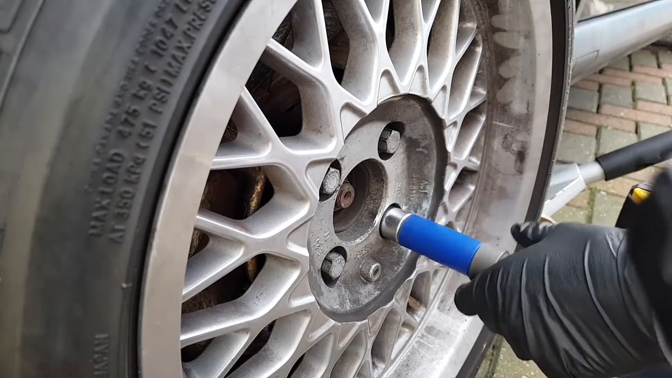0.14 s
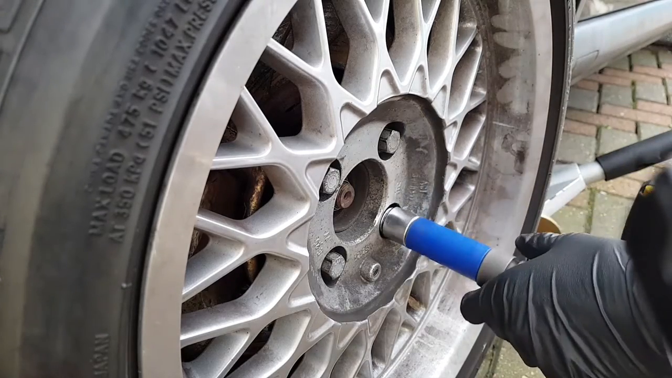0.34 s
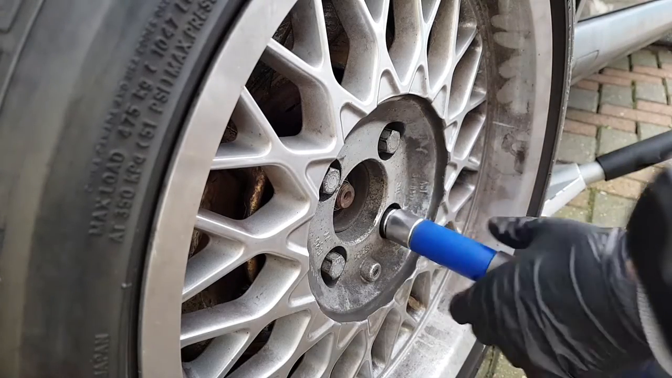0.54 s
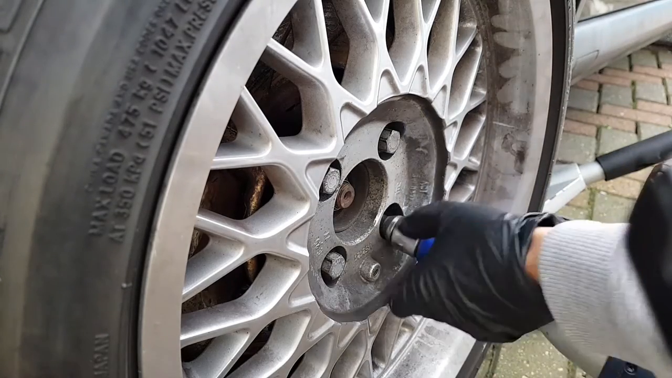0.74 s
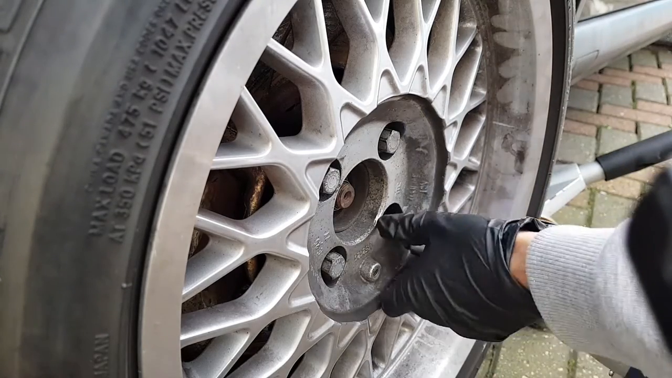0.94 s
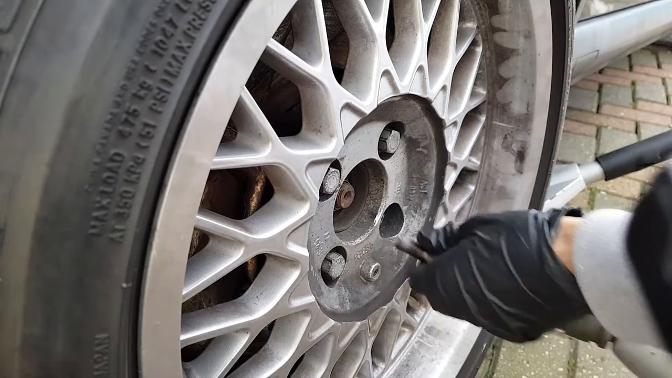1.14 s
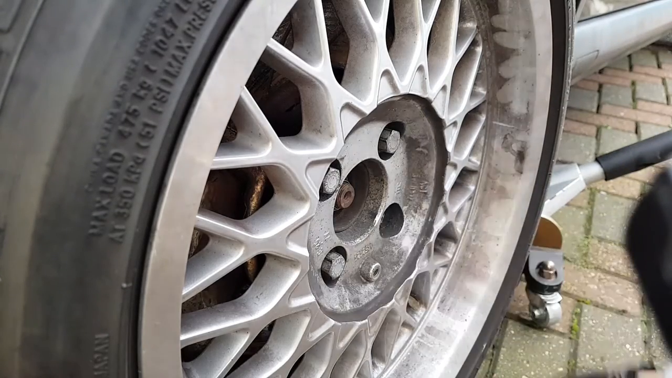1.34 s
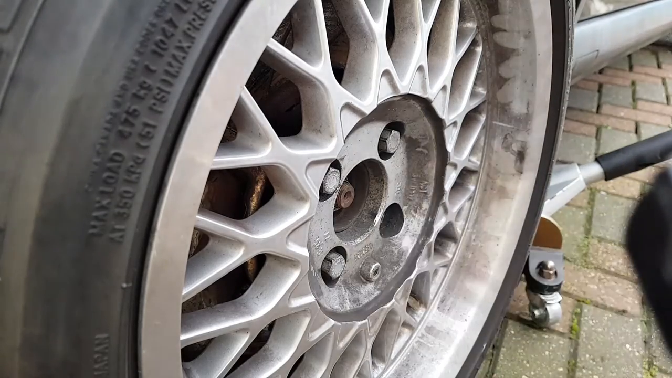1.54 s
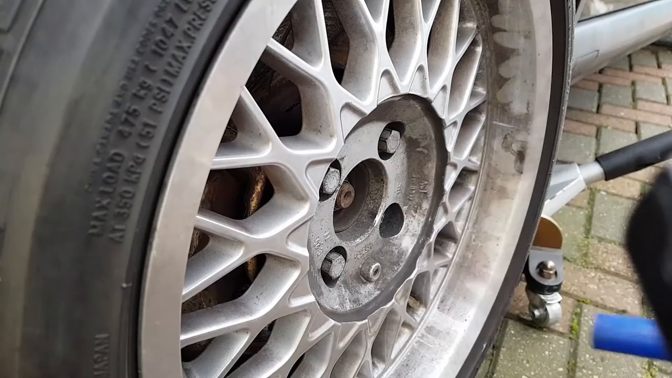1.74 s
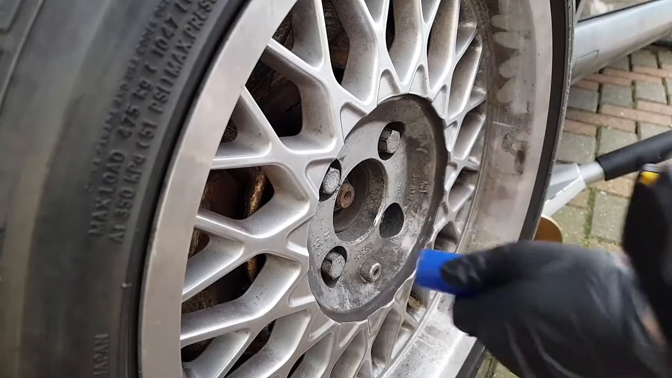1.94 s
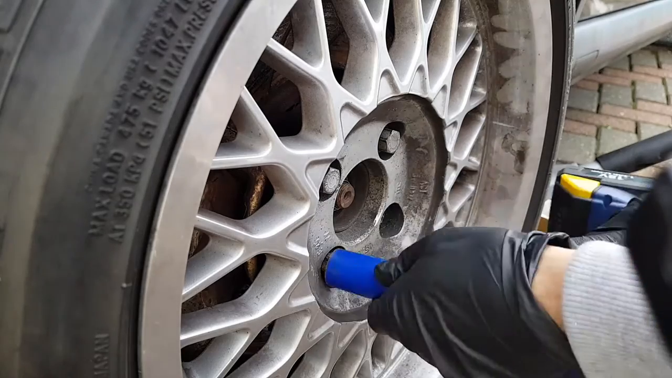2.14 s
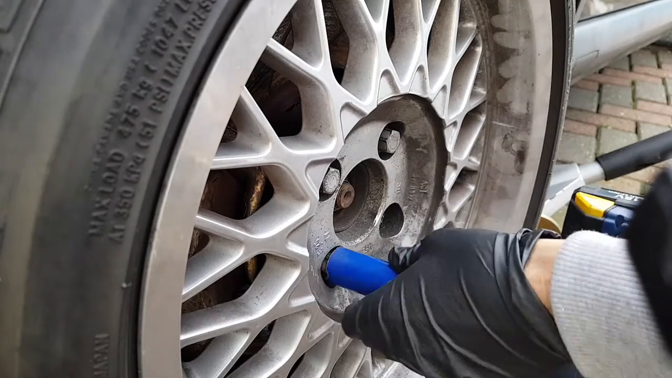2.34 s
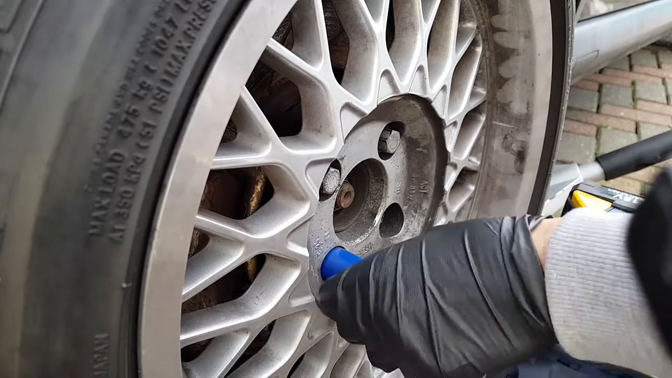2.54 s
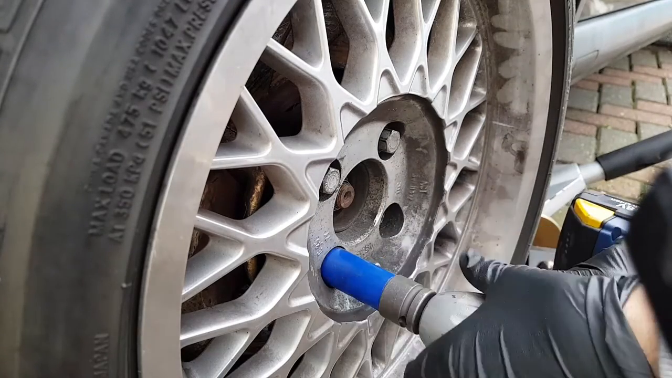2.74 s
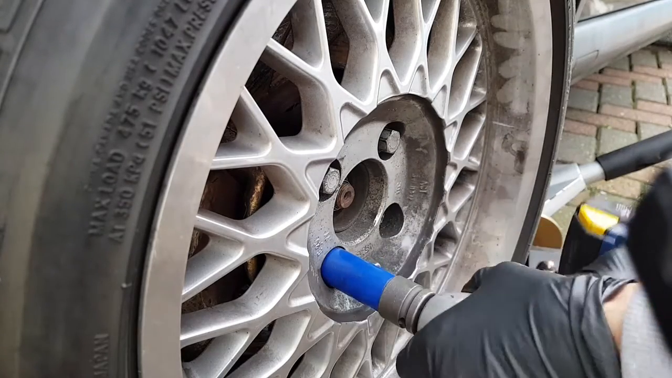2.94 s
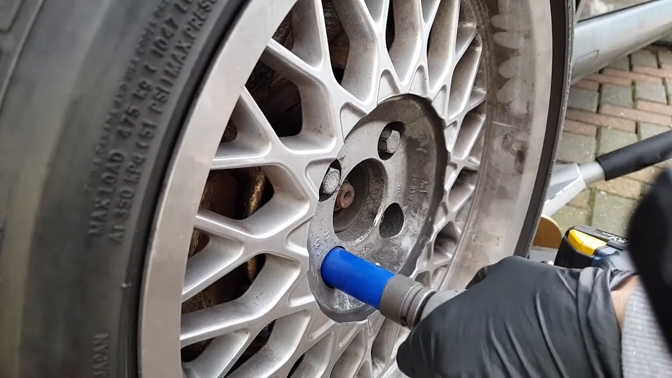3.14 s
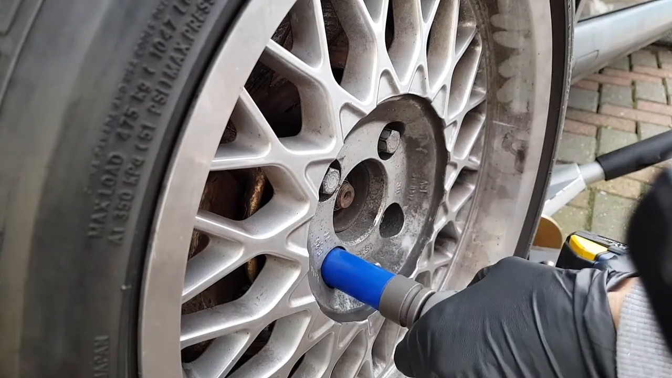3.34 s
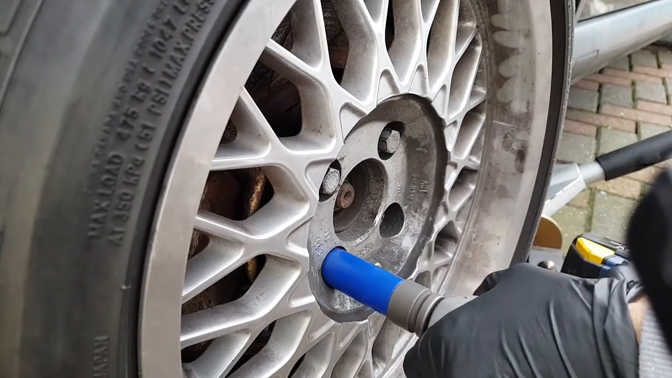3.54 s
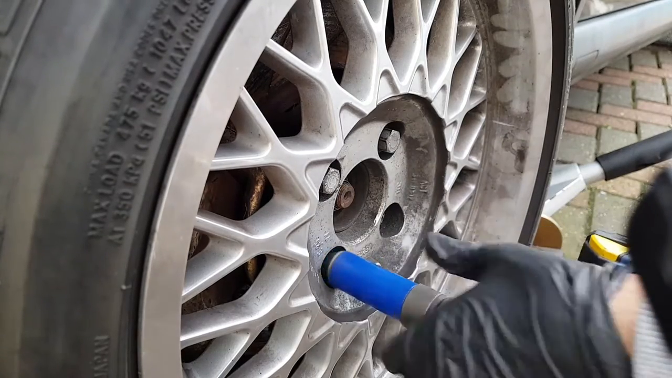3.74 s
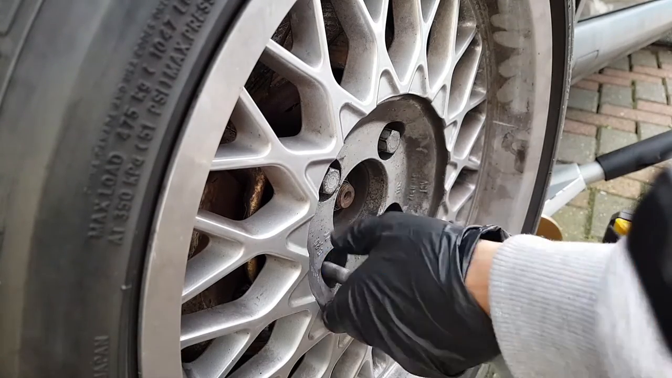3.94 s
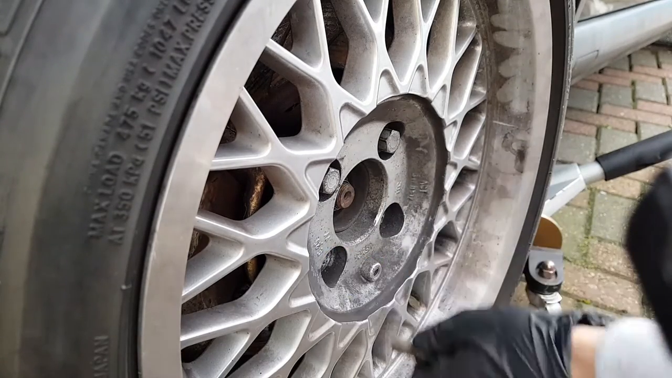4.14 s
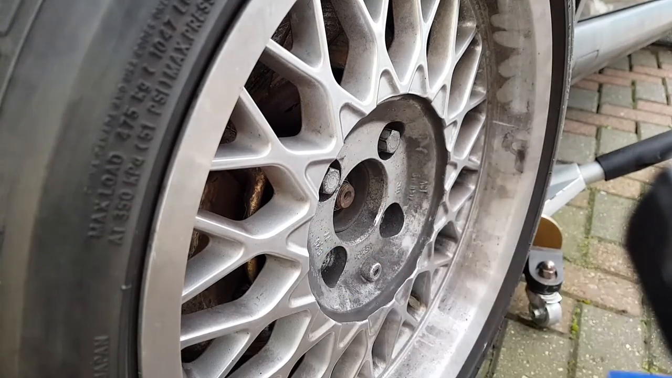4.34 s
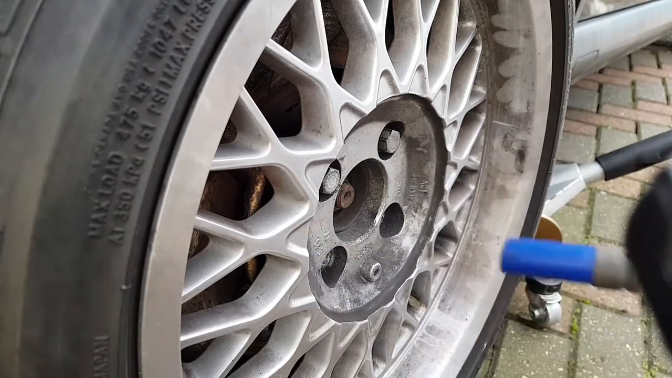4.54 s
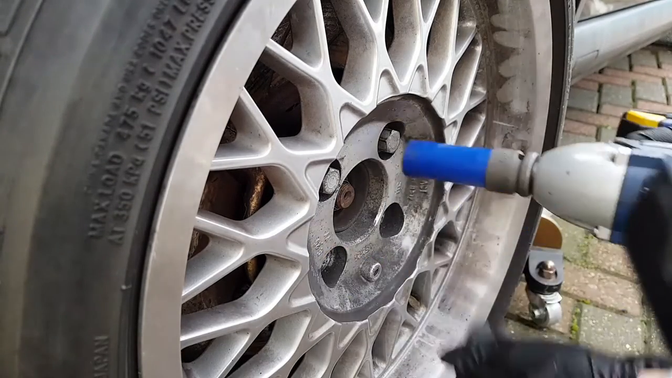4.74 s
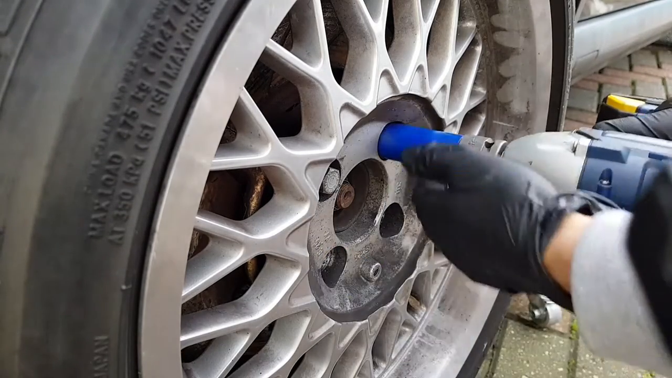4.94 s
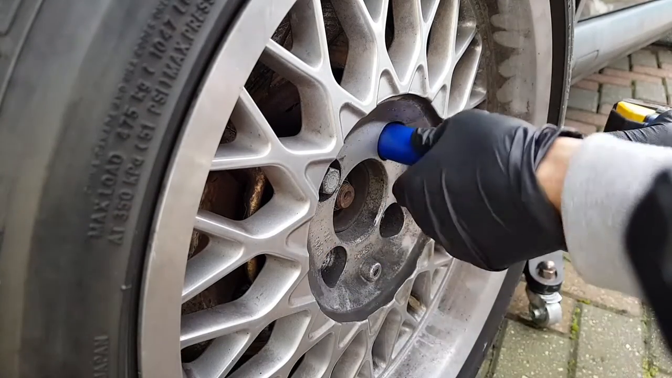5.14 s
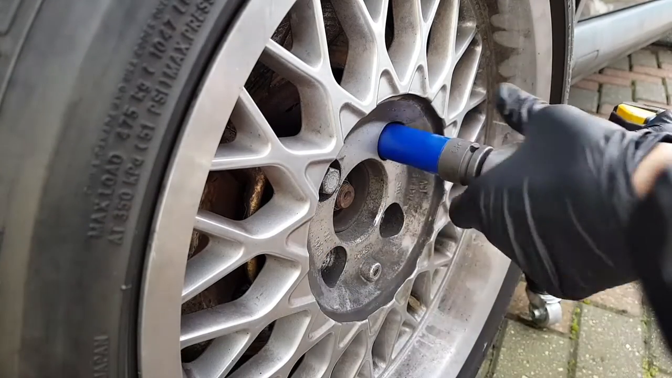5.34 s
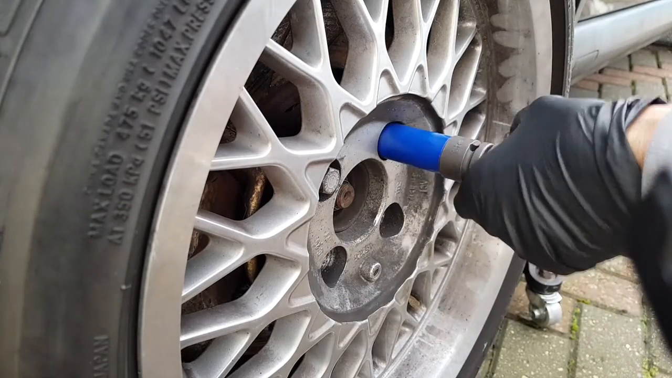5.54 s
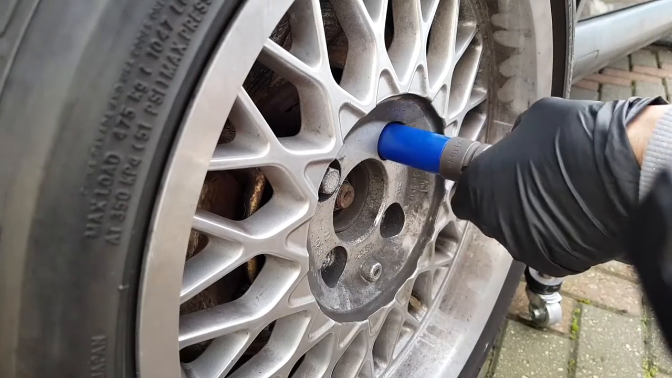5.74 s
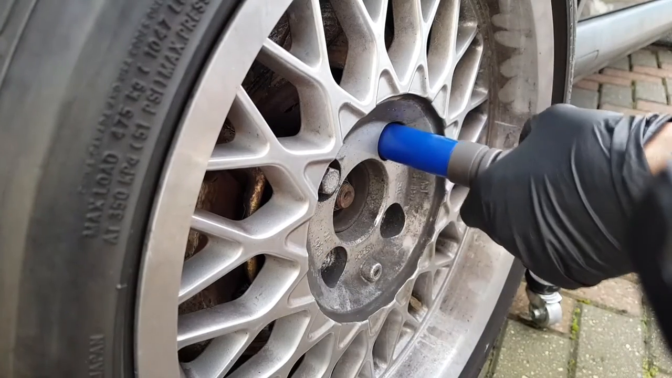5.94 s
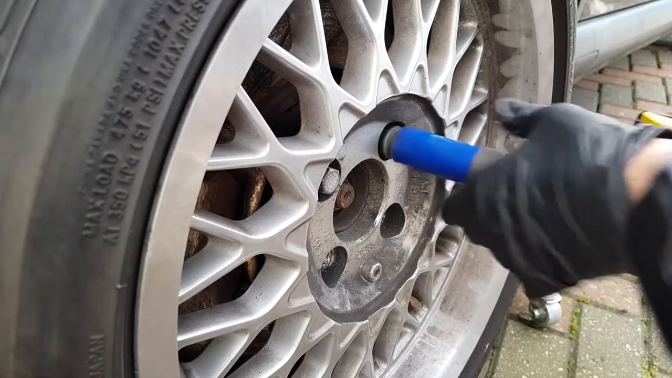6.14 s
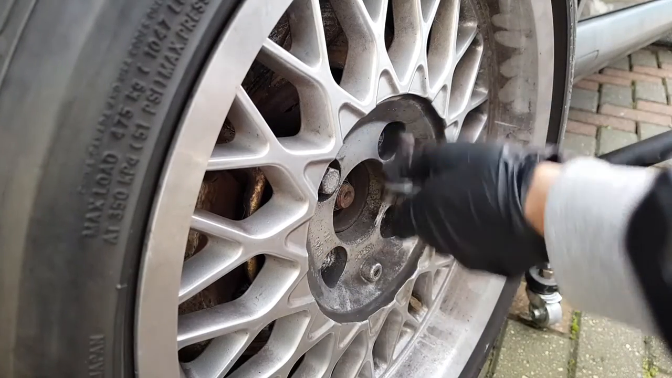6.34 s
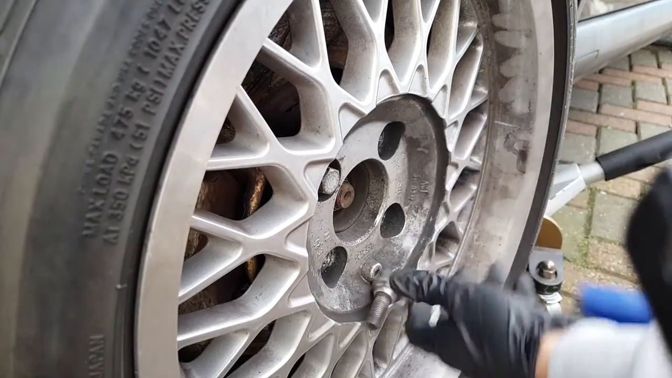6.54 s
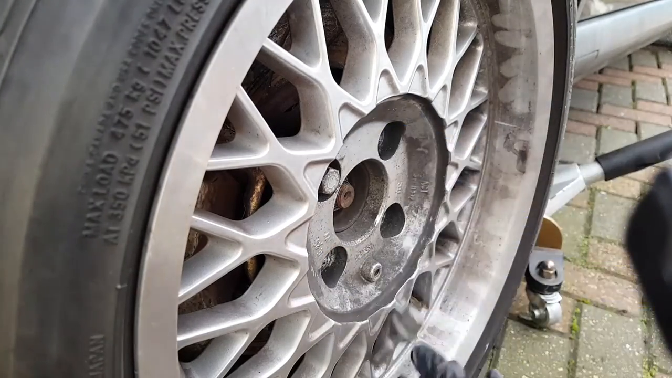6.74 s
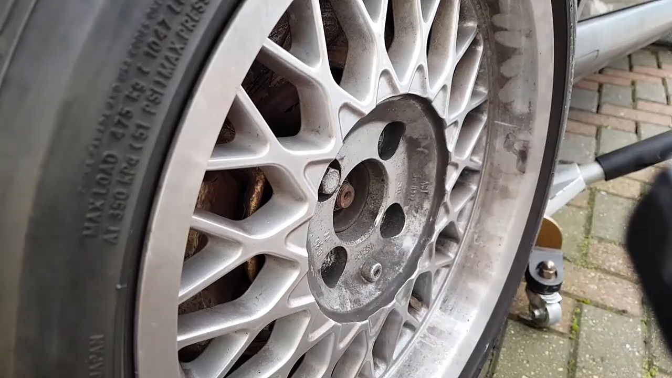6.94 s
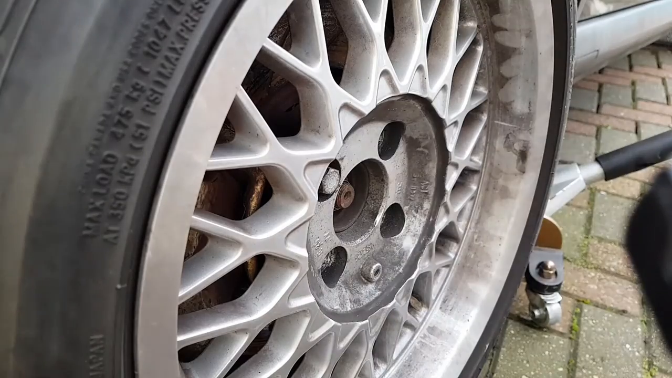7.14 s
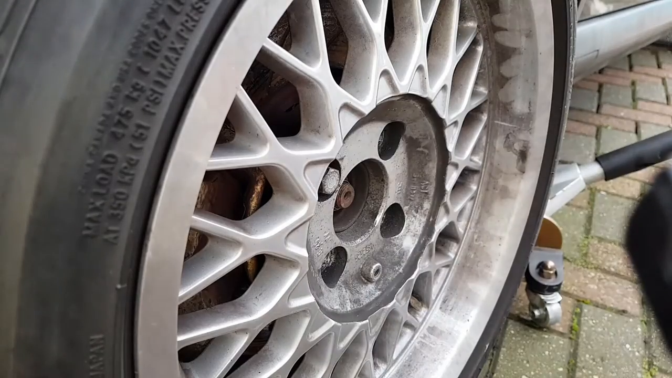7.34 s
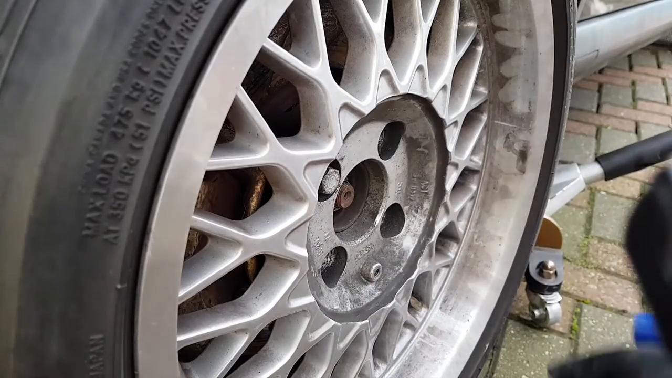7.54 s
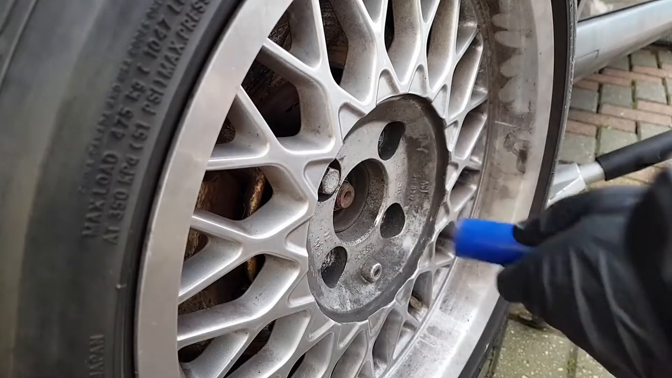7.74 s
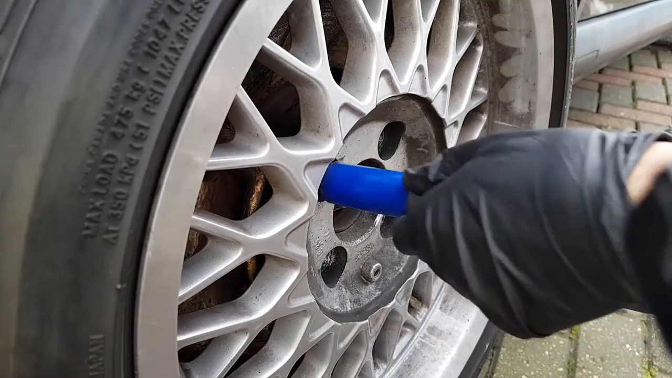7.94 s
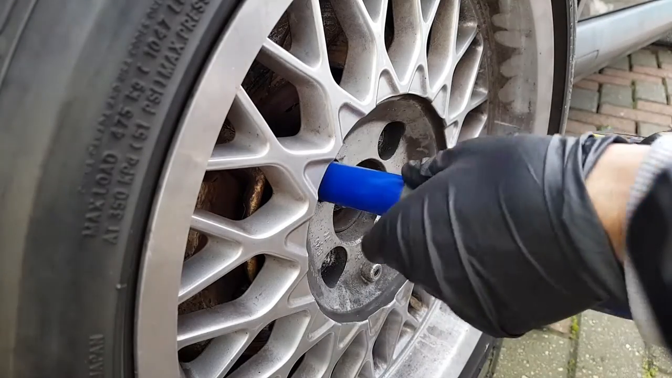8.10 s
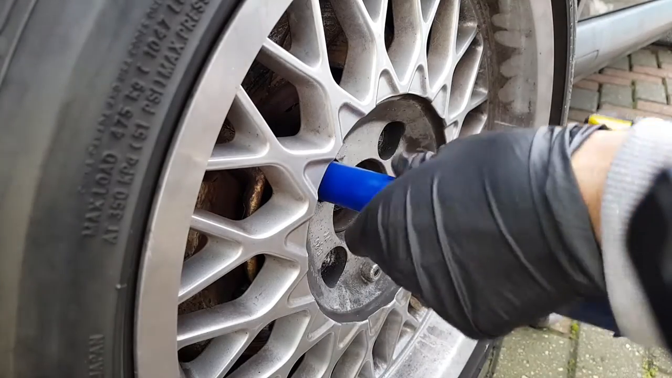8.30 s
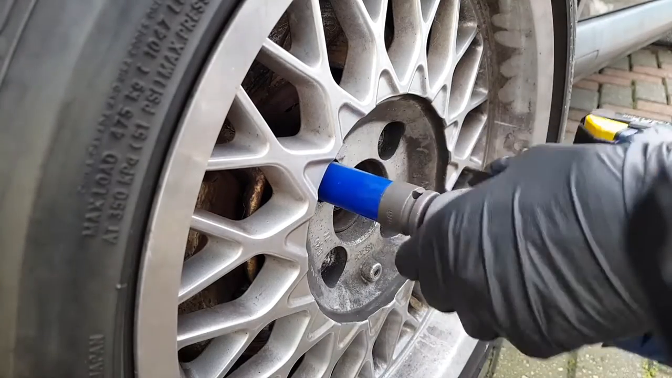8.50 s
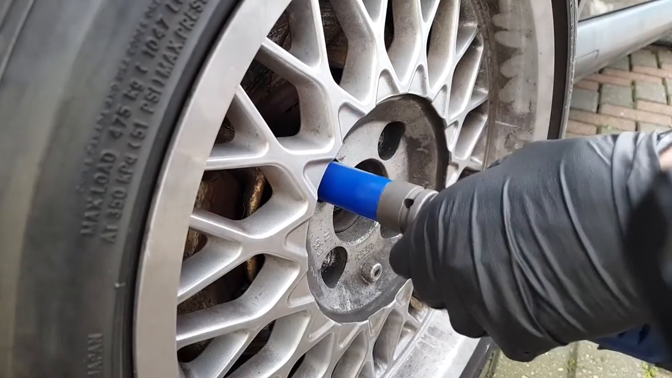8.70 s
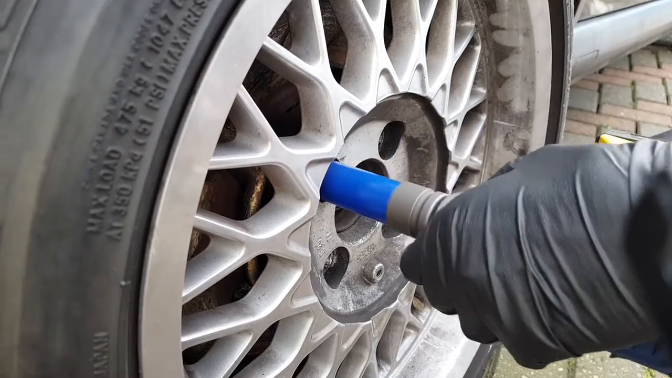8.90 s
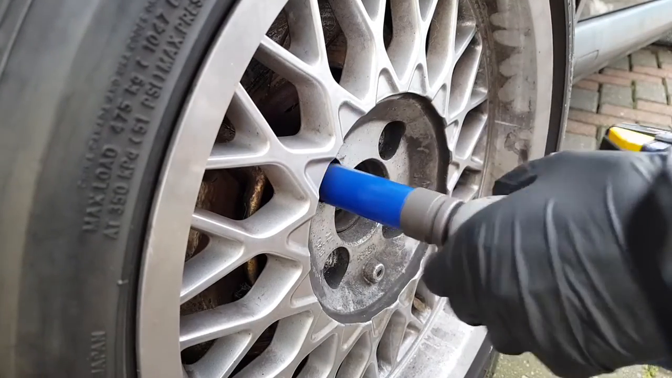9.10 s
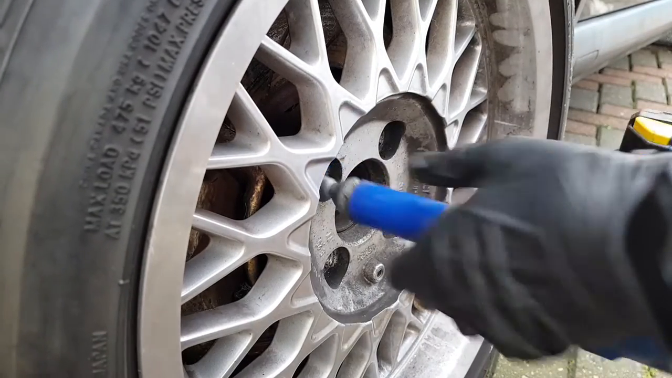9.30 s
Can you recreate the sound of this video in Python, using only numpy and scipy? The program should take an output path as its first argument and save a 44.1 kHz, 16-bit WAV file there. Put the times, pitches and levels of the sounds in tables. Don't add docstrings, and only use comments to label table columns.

```python
import sys
import numpy as np
from scipy import signal
from scipy.fft import rfft, irfft, next_fast_len
from scipy.io import wavfile
from scipy.ndimage import uniform_filter1d

SR = 44100
rng = np.random.default_rng(int(sys.argv[2]) if len(sys.argv) > 2 else 0)


def volts_from_decibels(level):
    exponent = np.asarray(level, float) / 20
    return 10 ** exponent


def log_audio(samples):
    frames = np.atleast_2d(samples).T
    limited = np.clip(frames, -1, 1)
    pcm = np.round(limited * 32767).astype(np.int16)
    wavfile.write(sys.argv[1], SR, pcm)


N = 413216
TIME = np.arange(N) / SR


def unit(x):
    return x / np.sqrt(np.mean(x ** 2) + 1e-20)


def decay(t, t60):
    return volts_from_decibels(-60 * t / t60)


def along(points, hz):
    f, v = np.transpose(points)
    return np.interp(np.log(hz + 1), np.log(f + 1), v)


def curves(rows):
    s, *columns = np.transpose(rows)
    return [np.interp(TIME, s, column) for column in columns]


def bursts(spells, fade=0.01):
    gate = 0
    for rows in spells:
        inside = np.minimum(TIME - rows[0][0], rows[-1][0] - TIME)
        gate = gate + np.clip(inside / fade + 1, 0, 1)
    return np.minimum(gate, 1), *curves([row for rows in spells for row in rows])


def wobble(rate):
    knots = rng.standard_normal(int(N * rate / SR) + 2)
    return np.interp(TIME * rate, np.arange(len(knots)), knots)


def filtered(x, response):
    m = next_fast_len(x.shape[-1] + 8192)
    return irfft(rfft(x, m) * response(np.fft.rfftfreq(m, 1 / SR)), m)[..., :x.shape[-1]]


def coloured(x, spectrum):
    return unit(filtered(x, lambda hz: volts_from_decibels(along(spectrum, hz))))


def modes(table):
    def response(f):
        total = 0
        for k, (centre, width, db) in enumerate(table):
            damping = 1j * f * width
            total = total + (-1) ** k * volts_from_decibels(db) * damping / (centre * centre - f * f + damping)
        return total
    return response


def rush(spectrum, patchy_db):
    z = signal.stft(rng.standard_normal(N + 512), nperseg=512)[2]
    field = uniform_filter1d(rng.standard_normal(z.shape), size=6, axis=0)
    field = uniform_filter1d(field, size=10, axis=1)
    noise = signal.istft(z * volts_from_decibels(patchy_db * unit(field)), nperseg=512)[1][:N]
    return coloured(noise, spectrum)


def add(track, s, sound):
    part = track[max(round(s * SR), 0):][:len(sound)]
    part += sound[:len(part)]


# (time [s], level [dB])
ROAD_LEVEL = [(0, -38), (1, -51.5), (1.7, -52.5), (2.3, -50.5), (2.7, -46), (3.15, -41.5), (3.9, -56),
              (4.5, -53), (5.3, -54.5), (6.2, -52.5), (7.2, -55), (7.9, -55), (8.4, -46.5), (9.37, -54)]
# (frequency [Hz], level [dB per Hz])
ROAD_RUMBLE = [(12, -67.5), (20, -24), (59, 0), (75, -1.5), (119, -4), (151, -19), (250, -26), (320, -60),
               (550, -120)]
TYRE_ROAR = [(88, -37), (150, -4), (314, -9), (340, -4), (414, -13), (448, -10), (623, -12.5), (901, -10.5),
             (1930, -35.5), (3500, -52.5), (4550, -61), (7700, -120)]
# (start [s], end [s], level [dB])
IDLING_ENGINE = (1.36, 3.1, -59)


def traffic():
    road_db, = curves(ROAD_LEVEL)
    on, off, db = IDLING_ENGINE
    fade_in_s, fade_out_s = 0.32, 0.57
    drone_db, = curves([(on - fade_in_s, db - 28), (on, db), (off, db), (off + fade_out_s, db - 24)])
    drone = volts_from_decibels(drone_db + 3.6 * wobble(8.9)) * np.sin(2 * np.pi * 345 * TIME + 1.2 * wobble(21))
    rumble = volts_from_decibels(road_db + 3 + 0.67 * wobble(3.9)) * rush(ROAD_RUMBLE, patchy_db=1.0)
    roar = volts_from_decibels(road_db + 0.3 * wobble(9.4)) * rush(TYRE_ROAR, patchy_db=2.5)
    return drone + rumble + roar


# (time [s], length [s], first pitch [Hz], held pitch [Hz], level [dB])
WHISTLES = [
    (1.94, .06, 5300, 4300, -75),
    (2.175, .14, 5700, 4250, -71),
    (2.32, .2, 4600, 4100, -71),
    (2.6, .13, 4200, 3750, -72),
    (2.73, .12, 4200, 3950, -66),
    (2.8, .2, 4150, 4050, -70),
]


def bird():
    out = np.zeros(N)
    flutter, waver_hz = volts_from_decibels(2 + 3.5 * wobble(70)), 130 * wobble(300)
    glide_s, attack_s, fade_db = 0.016, 0.0068, 7
    for s, length, from_hz, to_hz, db in WHISTLES:
        t = np.arange(round(length * SR)) / SR
        hz = to_hz + (from_hz - to_hz) * np.exp(-t / glide_s)
        hz = hz + waver_hz[round(s * SR):][:len(t)]
        loudness = volts_from_decibels(db - fade_db * t / length) * np.minimum(t / attack_s, 1)
        add(out, s, loudness * np.sin(2 * np.pi * np.cumsum(hz) / SR))
    return out * flutter


# (start [s], end [s], steady rustle [dB])
HANDS_MOVING = [
    (.93, 3.2, -76.5),
    (4.018, 5.544, -81.5),
    (6.373, 8.543, -81),
]
# (time [s], length [s], peak level [dB])
RUBS = [(0.932, .08, -75), (1.155, 0.067, -67), (1.396, 0.29, -76.5), (1.997, 0.22, -73.5),
        (2.377, 0.12, -70), (2.662, 0.19, -71), (2.81, 0.13, -59), (3.08, 0.22, -67.5), (4.02, .1, -67),
        (4.219, 0.34, -74), (5.035, 0.17, -83), (5.313, 0.073, -75.5), (5.426, 0.072, -66),
        (5.555, .08, -72), (6.909, 0.07, -62), (7.075, 0.086, -66), (7.668, 0.1, -69), (7.83, 0.16, -68),
        (8.474, 0.11, -61), (8.543, 0.16, -66)]
# (frequency [Hz], level [dB per Hz])
CLOTH_HISS = [(1290, -33), (2200, -15), (3680, -7.5), (4050, -6), (6050, -7.5), (12100, -16), (15000, -27)]


def gloves():
    gate, steady_db = bursts([[(start, db), (end, db)] for start, end, db in HANDS_MOVING], fade=0.05)
    rubs = sum(volts_from_decibels(db) * np.exp(-(2 * (TIME - s) / length) ** 2) for s, length, db in RUBS)
    grain = volts_from_decibels(3.4 * wobble(43) + 2.6 * wobble(400))
    return gate * (volts_from_decibels(steady_db) + rubs) * unit(grain * rush(CLOTH_HISS, patchy_db=2.5))


# (time [s], peak level [dB])
SOCKET_SLAPS = [(0.602, -33), (0.6503, -30.5), (0.6826, -25.5), (0.7051, -32), (0.7267, -25.5),
                (.7733, -26), (0.8023, -22.5), (0.8182, -32.5), (0.8545, -29.5), (3.4763, -15),
                (3.5183, -16), (3.6121, -21), (3.667, -23), (3.6741, -26.5), (3.8236, -30.5), (3.868, -31),
                (3.9425, -31.5), (3.9799, -21.5), (6.2864, -32.5), (6.3296, -23.5), (9.084, -26.5),
                (9.3155, -33), (9.3546, -25.5)]
# (time [s], peak level [dB], bright part [dB re peak])
SOCKET_SEATING = [(0.901, -26.5, -10), (2.2056, -42.5, -14), (2.3726, -56, 3), (2.406, -41, -28),
                  (2.4387, -38, -34), (2.461, -40.5, -32), (2.5832, -27.5, -13.5), (2.6435, -43, -21),
                  (3.0873, -29.5, -13.5), (3.1422, -36, -12.5), (3.1854, -39.5, -8), (4.8896, -52, -5),
                  (4.9114, -32.5, -11), (4.9287, -22.5, -12.5), (4.942, -37, -7), (7.6509, -41, 0),
                  (7.675, -31.5, -10.5), (8.052, -38.5, -6), (8.072, -29.5, -20), (8.096, -33, -26),
                  (8.106, -27.5, -20), (8.457, -35, -18)]
SOCKET_HOME = [
    (8.208, -29, -9.5),
]
BOLTS_ON_PAVING = [(1.8384, -51, -4), (1.8587, -50, 1), (1.8754, -56, 4), (1.9024, -46, -6),
                   (1.9183, -51, -14), (7.5273, -39, 3)]
BOLT_ON_BRICK = [
    (1.789, -28, 0.4),
]
BOLTS_ON_PILE = [
    (4.7331, -28.5, -12),
    (4.74, -46, -6),
    (7.5315, -25, -11),
]
BOLT_ON_RIM = [(6.544, -33.5, -14), (6.553, -32, -20), (6.5615, -19.5, -12.5), (6.599, -27.5, -33),
               (6.625, -20.5, -36.5), (6.6432, -31, -42), (6.6728, -40, -32), (6.734, -37, -36),
               (6.8511, -39.5, -35)]
# (time [s], peak level [dB])
FAINT_TOUCHES = [(0.8953, -47), (1.133, -44.5), (1.279, -56), (1.308, -53), (1.3284, -56), (1.5952, -56.5),
                 (1.62, -56.5), (4.0033, -48), (6.3494, -34), (6.4696, -45), (6.8887, -55), (4.865, -65),
                 (7.596, -54), (7.7055, -50), (7.78, -48.5), (7.878, -55), (8.1605, -52),
                 (4.073, -57),
    (4.115, -64),
    (4.301, -63),
    (4.3277, -58),
]
KNOCK_LEVELS = [-42.5, -37.5, -30.5, -43, -37.5]


def contacts():
    kinds = [
        [(s, db, -2) for s, db in SOCKET_SLAPS],
        SOCKET_SEATING + SOCKET_HOME,
        BOLTS_ON_PAVING + BOLT_ON_BRICK + BOLTS_ON_PILE,
        BOLT_ON_RIM,
        [(s, db, -11.5) for s, db in FAINT_TOUCHES],
    ]
    growth = 0.63
    rows = []
    for kind, knock_db in zip(kinds, KNOCK_LEVELS):
        for s, db, bright_db in kind:
            rows.append((s, db, knock_db + growth * (db + 34.5), db + bright_db))
    return rows


# (frequency [Hz], level [dB per Hz])
DULL_CLICK = [(900, -30), (1300, -9), (1700, -3.5), (2400, -11), (3300, -4.5), (4200, -10), (7000, -21.5),
              (12000, -53.5)]
BRIGHT_CLICK = [(2500, -32), (4000, -5.5), (5000, 3.5), (6500, -3), (9000, -6.5), (13000, -19),
                (15000, -25.5), (16000, -59)]
# (frequency [Hz], width [Hz], level [dB])
RIM_KNOCK = [(258, 37, -7), (402.3, 180, -2), (654, 240, 0.5), (1300, 720, -11)]


def clicks():
    dull, bright, knocks = np.zeros((3, N))
    t = np.arange(SR // 8) / SR
    for s, db, knock_db, bright_db in contacts():
        dull_fall = decay(t, 0.023) + volts_from_decibels(-30.5) * decay(t, 0.2)
        bright_fall = 0.74 * decay(t, 0.0035) + decay(t, 0.019) + volts_from_decibels(-28.5) * decay(t, 0.15)
        push = decay(t, 0.0018) + 0.51 * decay(t, 0.033) * rng.standard_normal(len(t))
        add(dull, s, volts_from_decibels(db) * dull_fall)
        add(bright, s, volts_from_decibels(bright_db) * bright_fall)
        add(knocks, s, volts_from_decibels(knock_db) * push)
    soft = volts_from_decibels(-3.0) * dull * rush(DULL_CLICK, patchy_db=-1.74)
    soft += volts_from_decibels(20.0) * filtered(knocks, modes(RIM_KNOCK))
    soft = filtered(soft, lambda hz: 1 / (1 + 1j * hz / 5000) ** 4)
    return soft + volts_from_decibels(-1.5) * bright * rush(BRIGHT_CLICK, patchy_db=4)


# (frequency [Hz], level [dB], 60 dB decay [s])
RIM_RING = [(656, -3.5, 0.046), (838, -3, 0.051), (1066, -6.5, 0.054), (1280, -9, 0.064),
            (1526, -3.5, 0.05), (1850, -20, 0.05), (2170, -8.5, 0.039), (2720, -12.5, 0.048),
            (5350, -21, .02)]
BRICK_RING = [(607, 1, 0.032), (1270, 6, 0.0091), (1700, -22, 0.006), (2760, -9, 0.0095),
              (4130, -20, 0.0071), (6900, -6.5, 0.01), (8270, 2, 0.007), (8800, -2, 0.0081),
              (10370, -6, 0.02)]
PILE_RING = [(605, -1, 0.0089), (850, -7, 0.015), (1400, 2, 0.0058), (4070, -25, 0.025), (4980, 4, 0.0052),
             (5140, 0, 0.0077), (6250, -28, 0.05), (6600, -24, 0.03)]
SOCKET_CHINK = [(3330, 3.5, 0.011), (3610, -9.5, .04), (2250, -12, 0.022)]


def tumble():
    out, t = np.zeros(N), np.arange(SR // 8) / SR
    attack = 1 - np.exp(-t / 0.00027)
    landings = [(BOLT_ON_RIM, RIM_RING, -3.5), (BOLT_ON_BRICK, BRICK_RING, 10.5),
                (BOLTS_ON_PILE, PILE_RING, 5), (SOCKET_HOME, SOCKET_CHINK, 2)]
    for rows, ringing, gain_db in landings:
        for s, db, _ in rows:
            ring = 0
            for hz, mode_db, t60 in ringing:
                level_db = db + gain_db + mode_db + rng.normal(0, 2)
                ring = ring + volts_from_decibels(level_db) * decay(t, t60) * np.sin(2 * np.pi * hz * t)
            add(out, s, attack * ring)
    return out * volts_from_decibels(4.2 * uniform_filter1d(wobble(600), size=40))


# (time [s], commutator tone [Hz], whirr level [dB], load on the gear teeth [dB])
FREE_RUNS = [
    [(.21, 1750, -41.5, -8), (.256, 1834, -36.5, -9), (.34, 1916, -36, -12), (.382, 1810, -36, -6),
     (.44, 1709, -39, -16), (.49, 1500, -62, -3)],
    [(.52, 1660, -45.5, -9), (.6, 1858, -36, -9), (.66, 1993, -38, 8), (.69, 1890, -37.5, 4),
     (.75, 2038, -38, -5), (.79, 1930, -42, 5), (.82, 2060, -39.5, -5), (.86, 1880, -43, 3),
     (.89, 1700, -54.5, -2)],
    [(3.46, 1678, -39, 4.5), (3.6, 1760, -38, -5), (3.656, 1775, -37.5, -1), (3.742, 2040, -43, 4),
     (3.8, 2100, -43.5, 3), (3.884, 2130, -43.5, 1), (3.94, 1835, -38.5, -3), (3.965, 1747, -60.5, 4)],
    [(5.885, 1760, -42.5, -13), (5.95, 1930, -41.5, 1.5), (6.0, 2000, -42, 1), (6.075, 1994, -40.5, -1.5),
     (6.1, 2010, -42, 2), (6.17, 2100, -41, 0), (6.275, 1570, -42, 0), (6.3, 1478, -51, -8)],
    [(8.83, 1780, -38.5, -4), (8.93, 1894, -40, -6), (8.99, 1928, -41, -1.5), (9.044, 1913, -38.5, -6),
     (9.07, 1850, -40.5, -1), (9.122, 1991, -41, -8), (9.184, 2084, -40, -6), (9.3, 1540, -43, 3.5),
     (9.335, 1400, -47, -2)],
]
# (whine [dB re whirr], overtones [dB re whirr], gear teeth [dB re whirr])
RUN_VOICES = [
    (-13, -18.5, -8.5),
    (-7.5, -13, -11.5),
    (-6.5, -10.5, -11),
    (-11.5, -10, -6),
    (-6, -11, -4),
]
# (multiple of the commutator tone, level [dB])
COMMUTATOR_OVERTONES = [(3, -3.5), (4, 6.5), (5, 5), (6, -4.5)]
# (multiple of the mesh tone, level [dB])
GEAR_OVERTONES = [(1, -3.5), (2, -1.5), (3, 0), (4, 4.5), (5, -5.5), (6, -1.5), (7, -7)]
# (frequency [Hz], level [dB per Hz])
BRUSH_AND_FAN = [(35, -39), (60, -17.5), (253, -4), (311, -12), (787, -7.5), (1470, -11.5), (2390, -11),
                 (3090, -12), (4800, -11.5), (5390, -10), (13900, -20), (15300, -38.5)]
# (end [s], length [s], final level [dB])
SPIN_UPS = [
    (0.558, 0.072, -40.5),
    (3.233, 0.039, -36.5),
    (5.614, .055, -41),
    (8.612, 0.049, -37.5),
]
# (frequency [Hz], level [dB per Hz])
SPIN_UP_NOISE = [(1060, -40.5), (1800, -6), (2380, -17.5), (3240, -1.5), (3920, -23), (5090, -10),
                 (11400, -27.5), (12000, -33), (15600, -64), (22000, -120)]


def motor():
    gate, hz, whirr_db, load_db = bursts(FREE_RUNS)
    voices = [(run[end][0], *voice) for run, voice in zip(FREE_RUNS, RUN_VOICES) for end in (0, -1)]
    whine_db, upper_db, tooth_db = whirr_db + curves(voices)

    slowing_hz_per_s = -uniform_filter1d(np.gradient(hz), size=900) * SR
    coasting = np.clip(slowing_hz_per_s / 2700, 0, 1)
    upper_db = upper_db + 3 * (hz - 2000) / 100
    tooth_db = tooth_db + load_db - 9 * coasting
    whine_db = whine_db + 3 * coasting

    uneven_speed = 1 + 0.0036 * wobble(60) + 0.0036 * wobble(250)
    turn = 2 * np.pi * np.cumsum(hz * uneven_speed) / SR
    whine = volts_from_decibels(whine_db + 0.5 + 3 * wobble(35)) * np.sin(turn + 0.5 * wobble(150))
    for k, db in COMMUTATOR_OVERTONES:
        whine += volts_from_decibels(upper_db + db + 1.8 * wobble(40)) * np.sin(k * turn)

    mesh = 0.611 * turn + 0.5 * wobble(150)
    gears = np.zeros(N)
    for k, db in GEAR_OVERTONES:
        beading = volts_from_decibels(5.5 * np.sin(turn / 76 + k) + 2 * wobble(45))
        gears += volts_from_decibels(tooth_db + db) * beading * np.sin(k * mesh)

    flicker = volts_from_decibels(1.9 * wobble(300) + 0.68 * wobble(51))
    whirr = unit(flicker * rush(BRUSH_AND_FAN, patchy_db=2.0))
    rises = [[(s - length, db - 14.5), (s, db)] for s, length, db in SPIN_UPS]
    starting, start_db = bursts(rises, fade=0.0057)
    spin_up = starting * volts_from_decibels(start_db) * rush(SPIN_UP_NOISE, patchy_db=-2.5)
    return gate * (whine + gears + volts_from_decibels(whirr_db + 0.5) * whirr) + spin_up


# (time [s], peak level [dB])
SLACK_TAPS = [(.0002, -23), (.0115, -12.5), (0.0166, -14.5), (3.2403, -13), (3.2694, -3), (5.613, -6.5),
              (5.6345, -18), (8.619, -5), (8.6415, -13), (8.6453, -13), (8.8762, -11)]
# (time [s], peak level [dB], rebound [dB re blow], spoke ring [dB re that bolt's usual])
HAMMER_BLOWS = [(0.0254, 1, -9, -0.75), (0.0551, 0, -9, 0), (0.0837, -0.5, -11.5, -2),
                (0.1113, -1, -9, -1.6), (0.1374, -2.5, -9.5, -1), (0.165, -1.5, -9, -1.3),
                (0.192, -2.5, -9.5, -1.05), (3.2811, 0.5, -6.5, -3.9), (3.311, 0.5, -7.5, -0.9),
                (3.3389, -0.5, -9, 1.2), (3.3657, 1, -8, -2.9), (3.3938, -0.5, -9.5, 0.6),
                (3.4206, 0, -9.5, -0.5), (3.4477, 1, -12, 0), (5.6428, -0.5, -8, -1.5),
                (5.6732, -1.5, -8, -3), (5.699, -0.5, -8.5, 0.7), (5.7268, -1, -10, -0.5),
                (5.7538, -1, -11, -0.6), (5.7805, -2.5, -8.5, 3.2), (5.8096, -0.5, -9.5, -0.5),
                (5.8366, -1, -8.5, 0), (5.8663, -1.5, -12.5, -0.6), (8.6531, 0.5, -9.5, -1.2),
                (8.6831, -0.5, -7, -1.5), (8.7093, -0.5, -8.5, -0.7), (8.737, -2.5, -9.5, -1),
                (8.7639, -1, -9, -0.2), (8.7908, 0, -9, 0.7), (8.818, -3, -9.5, 0.8)]
BLOWS_PER_BOLT = [7, 7, 9, 7]
# (thud [dB re blow], spoke ring [dB re blow])
BOLT_SOUNDS = [
    (-14, -22),
    (-14, -23.5),
    (-16, -18.5),
    (-15, -13.5),
]


def blows():
    rows = [(s, db, -10.5, -16, -30) for s, db in SLACK_TAPS]
    seats = np.repeat(BOLT_SOUNDS, BLOWS_PER_BOLT, axis=0)
    scatter = 1.5 * rng.standard_normal(len(HAMMER_BLOWS))
    lag_s = 0.0007
    for (s, db, rebound_db, ring_db), (thud_db, spoke_db), extra_db in zip(HAMMER_BLOWS, seats, scatter):
        rows.append((s + lag_s, db, thud_db + extra_db, spoke_db + ring_db, rebound_db))
    return sorted(rows)


# (frequency [Hz], level [dB per Hz])
ANVIL_CLATTER = [(530, -24), (900, -4), (1610, -12), (2160, -7), (2410, -7.5), (3360, -3.5), (4410, -5.5),
                 (5140, -1), (8870, -8), (13800, -8.5), (15300, -28.5)]
# (frequency [Hz], width [Hz], level [dB])
SOCKET_MODES = [(2140, 43, -4.5), (3400, 170, -6), (5140, 97, 3.5), (5770, 75, -8.5), (10100, 61, -1)]
CRACK_MODES = [(1700, 470, -7.5), (3332, 520, -3), (5200, 1100, -4), (8800, 3000, -4.5), (12500, 3000, -11)]
WHEEL_MODES = [(68.5, 74, -2.5), (114, 160, -4.5), (205, 44, -3.5), (260, 48, -5), (414, 44, -4),
               (595, 150, -4.5), (768, 100, 0.5), (867, 160, -5)]
SPOKE_MODES = [(1500, 180, 2.5), (1810, 240, 5), (2170, 60, -0.5)]


def hammer():
    clatter, shake, strikes, thuds, spokes = np.zeros((5, N))
    t = np.arange(SR // 10) / SR
    rows = blows()
    waits = np.diff(np.transpose(rows)[0], append=99)
    lateness = 0.0005 * rng.standard_normal(len(rows))
    for (s, db, thud_db, spoke_db, rebound_db), wait, late in zip(rows, waits, lateness):
        past_cam = np.clip((t - min(wait, 0.029) + 0.0036) / 0.001, -50, 50)
        rattle = volts_from_decibels(-15) * decay(t, 0.4) / (1 + np.exp(past_cam))
        since = t - min(wait, 0.032) + 0.0075 - late
        rebound = volts_from_decibels(rebound_db + 3) * decay(np.abs(since), 0.009) * (since > 0)
        crash = 1.3 * volts_from_decibels(-60 * (t / 0.0075) ** 2) + 0.32 * decay(t, 0.11) + volts_from_decibels(-27.0) * decay(t, 0.23)
        add(clatter, s, volts_from_decibels(db) * crash)
        add(shake, s, volts_from_decibels(db) * (rattle + rebound))
        add(strikes, s, volts_from_decibels(db) * decay(t, 0.00066))
        add(thuds, s, volts_from_decibels(db + thud_db) * (decay(t, 0.052) + 0.78 * rattle + 2.4 * rebound))
        add(spokes, s, volts_from_decibels(db + spoke_db) * (decay(t, 0.011) + 1.4 * rattle))

    noise = volts_from_decibels(-13.5 + 1.3 * wobble(700)) * coloured(rng.standard_normal(N), ANVIL_CLATTER)
    rattling = 1.4 * shake * volts_from_decibels(2.4 * wobble(330)) * noise
    rattling = filtered(rattling, lambda hz: 1 / (1 + 1j * hz / 9000) ** 2)
    contact = strikes * np.sign(rng.standard_normal(N))
    ring = volts_from_decibels(1.5) * filtered(contact, modes(SOCKET_MODES))
    crack = volts_from_decibels(-6) * filtered(contact, modes(CRACK_MODES))
    wheel = volts_from_decibels(18.0) * filtered(thuds * rng.standard_normal(N), modes(WHEEL_MODES))
    spoke = volts_from_decibels(13.5) * filtered(spokes * rng.standard_normal(N), modes(SPOKE_MODES))
    return clatter * noise + rattling + ring + crack + wheel + spoke


# (frequency [Hz], 60 dB decay [s])
YARD_DECAY = [(200, 0.27), (2000, 0.099), (10000, 0.11)]


def yard(x):
    hz, t, z = signal.stft(rng.standard_normal(SR // 3), SR, nperseg=256)
    fading = decay(t, along(YARD_DECAY, hz)[:, None])
    tail = signal.istft(z * fading, SR, nperseg=256)[1]
    return signal.fftconvolve(x, tail / np.linalg.norm(tail))[:N]


# (frequency [Hz], level [dB per Hz])
STEREO_HISS = [(1000, -40), (2500, -1), (11000, 2.5), (13500, -3), (15000, -35)]


def scene():
    far = bird()
    near = clicks() + tumble() + motor() + hammer()
    echo = volts_from_decibels(-10.5) * yard(near + 3 * far)
    mid = traffic() + far + gloves() + near + echo
    side = volts_from_decibels(-86) * rush(STEREO_HISS, patchy_db=4.5)
    return np.array([mid + side, mid - side])


def top_cut(x):
    return signal.sosfilt(signal.butter(12, 15850, fs=SR, output="sos"), x)


def record(dry):
    clipped = dry / (1 + np.abs(dry / 0.92) ** 8) ** (1 / 8)
    mix = filtered(clipped, lambda hz: 1 / (1 + (hz / 14900) ** 40))
    return top_cut(mix)


dry = scene()
out = record(dry)
log_audio(out)
```